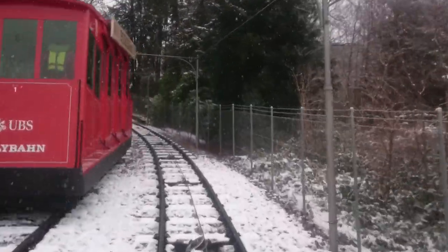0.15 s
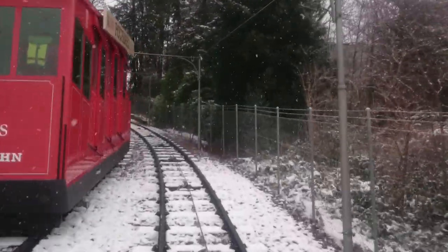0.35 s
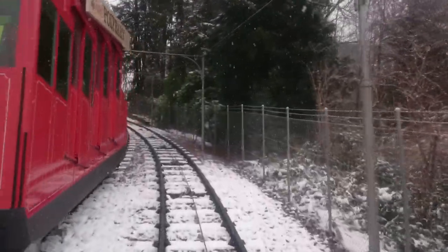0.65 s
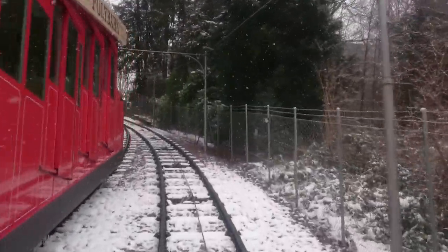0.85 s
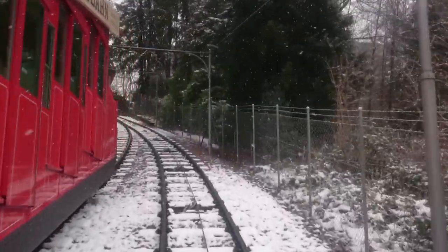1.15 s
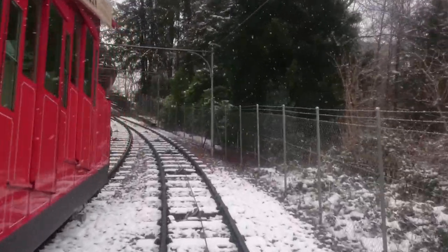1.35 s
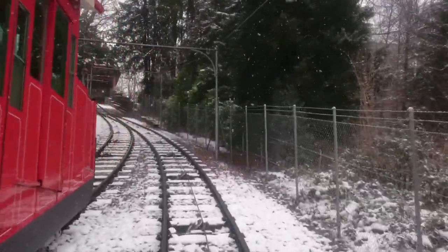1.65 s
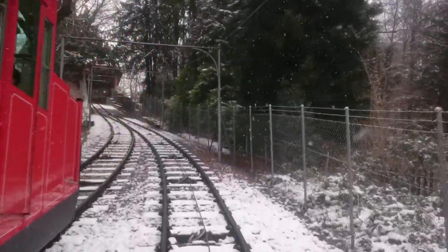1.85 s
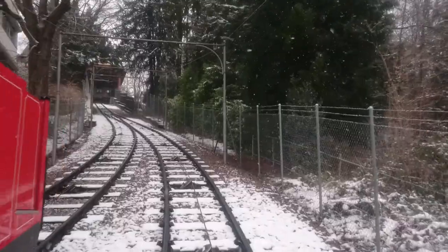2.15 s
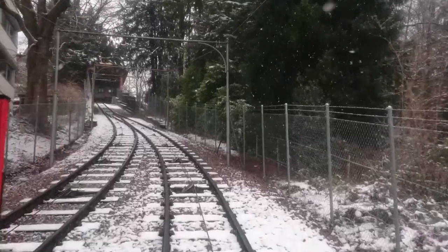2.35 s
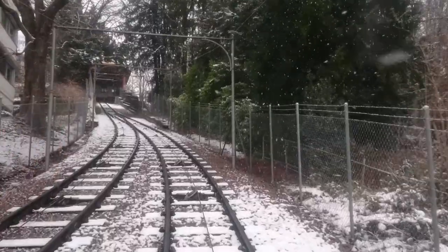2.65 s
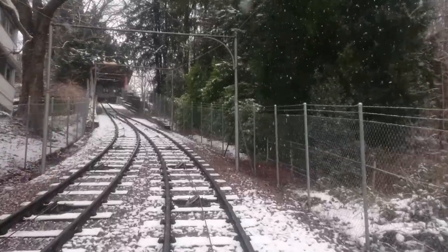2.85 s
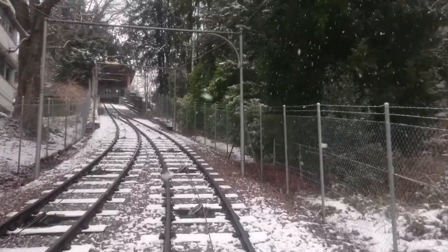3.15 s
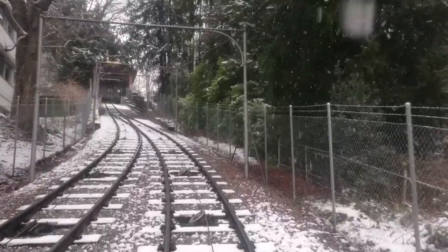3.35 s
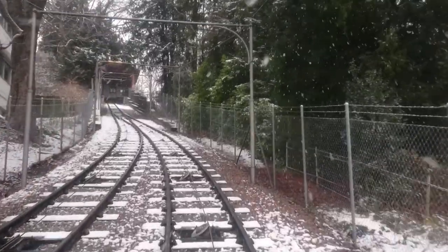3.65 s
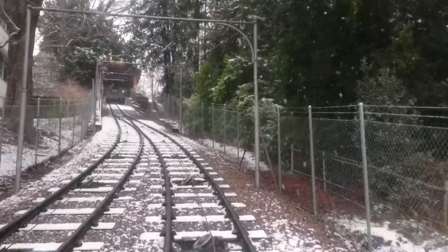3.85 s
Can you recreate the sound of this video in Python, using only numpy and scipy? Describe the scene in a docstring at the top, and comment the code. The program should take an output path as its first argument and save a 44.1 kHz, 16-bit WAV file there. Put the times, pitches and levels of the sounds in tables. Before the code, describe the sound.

Wind buffets the microphone in rough gusts over faint hissing rail wheels, knocks and ticks.

```python
"""A snowy slope, heard from the open front of a funicular car while another car rolls past.
Wind buffets the two microphone ports separately: noise split by eddy size, with sharp snaps and cracks.
Under it the wheels hiss and ring on the rails (noise through resonances), rollers knock (grit ringing
decaying tones) and metal fittings tick (short bright noise). The strongest buffets overload the recorder."""
import sys
import numpy as np
from scipy import signal
from scipy.fft import rfft, irfft
from scipy.io import wavfile
from scipy.ndimage import uniform_filter1d

SR = 44100
rng = np.random.default_rng(int(sys.argv[2]) if len(sys.argv) > 2 else 0)


def file_out(sig):
    """Save sig as 16-bit WAV at sys.argv[1]."""
    # one column per channel
    cols = np.atleast_2d(sig).T
    # limit, then scale
    lim = np.clip(cols, -1, 1)
    pcm = np.round(lim * 32767).astype(np.int16)
    wavfile.write(sys.argv[1], SR, pcm)


def to_linear_factor(level_db):
    """Convert decibel levels (scalar or array-like) to linear amplitude factors."""
    exponent = np.asarray(level_db, float) / 20
    return 10 ** exponent


N = 176400  # length in samples: 4 s
FULL_GUST_DB = -14.5  # gust level that counts as a full gust

# roller knocks, which also make the rolling noise swell: (time [s], level before a common trim [dB])
KNOCKS = [(0.511, -38), (2.0806, -34), (2.3215, -33.5), (2.5732, -26.5), (2.8258, -34.5), (3.1, -38)]


def shaped(z, gain):
    """Filters each row by a gain over frequency."""
    return irfft(rfft(z) * gain, z.shape[-1])


def evened(x):
    """Scales to rms 1."""
    return x / np.sqrt(np.mean(x ** 2) + 1e-20)


def read(points, hz):
    """Reads a table on a log-frequency axis."""
    f, value = np.transpose(points)
    return np.interp(np.log(hz + 1), np.log(f + 1), value)


def add(mix, s, sound):
    """Mixes rows of sound in at time s."""
    part = mix[:, round(s * SR):][:, :sound.shape[1]]
    part += sound[:, :part.shape[1]]


def wind(gust_points, snap_points):
    """One turbulent stream split by eddy size; faster air lifts most small eddies more, in quick flutters."""
    # eddy sizes, large to small: (centre [Hz], level in a full gust [dB],
    # rise per dB of gust [dB/dB], flutter strength [dB])
    eddies = [(40, -46, 2.5, 0.5), (61.6, -21, 0.32, 2.5), (94.6, -16, 1.13, 1.5),
              (145.4, -20.5, 0.84, 5.5), (233.3, -20.5, 1.66, 4), (377, -26, 2.03, 4.5),
              (623, -42.5, 1.58, 6.5), (960, -46.5, 2, 8), (1700, -65.5, 4, 5)]
    eddy_octaves, flutter_hz = 0.35, 114  # spread of each band, upper limit of the flutter
    puff_db, puff_s = 4.5, 0.009  # the air speeds up briefly around each snap
    hz = np.fft.rfftfreq(N, 1 / SR) + 1e-3
    air = rng.standard_normal(N)

    flutter_gain = np.exp(-(hz / flutter_hz) ** 2) * np.minimum(hz / 8, 1)
    flutter = evened(shaped(rng.standard_normal(N), flutter_gain))
    flutter = 2 * np.tanh(flutter / 2)  # rounds off the extremes

    t = np.arange(0, N, 32) / SR
    puffs = np.tanh(sum(np.exp(-((t - s) / puff_s) ** 2) for s, _ in snap_points))
    coarse_db = np.interp(t, *np.transpose(gust_points)) + puff_db * puffs
    gust_db = np.interp(np.arange(N) / SR, t, coarse_db) - FULL_GUST_DB

    stream = np.zeros(N)
    for f, db, follow, flutter_db in eddies:
        band = evened(shaped(air, np.exp(-.5 * (np.log2(hz / f) / eddy_octaves) ** 2)))
        stream += to_linear_factor(db + follow * gust_db + flutter_db * flutter) * band
    return stream


def rolling():
    """Wheel noise through rail and car-body resonances, with drifting patches and a treble rattle."""
    # relative spectrum of wheels on rails: (frequency [Hz], level per Hz [dB])
    rail_spectrum = [(150, -12.5), (500, -5), (700, -7.5), (1000, -10.5), (1300, -11.5), (1700, -16.5),
                     (2050, -20.5), (2400, -17), (2900, -25), (3700, -27.5), (4800, -37), (5400, -31.5),
                     (6300, -30), (7300, -37), (9000, -44.5), (11500, -54), (15300, -54)]
    # course of the rolling: (time [s], level before a common lift [dB], extra treble [dB])
    roll_course = [(0, -50, 1.5), (0.501, -49.5, 1), (.9, -50.5, 4.5), (1.201, -49, 2), (1.6, -49, 4),
                   (2.2, -47.5, 1.5), (2.7, -48.5, -0.5), (3.201, -50.5, -1), (4, -51.5, -1)]
    # likeness of the two sides: (frequency [Hz], correlation [-1 to 1])
    side_likeness = [(200, -0.3), (550, -0.82), (1000, -0.46), (1800, 0.5), (2250, -0.43), (2800, 0.13),
                     (13000, 0.02)]
    # balance of the two sides: (frequency [Hz], left minus right [dB])
    side_balance = [(300, -1), (900, -5), (1700, -4), (2500, -1.5), (2900, 1.5), (4400, -2.5), (5500, -0.5),
                    (6300, -5.5), (12000, 1.5), (14500, 4)]
    # rail and car-body resonances: (centre [Hz], width [Hz], lift [dB])
    resonances = [(700, 7.9, 7.5), (1160, 41, 3.5)]
    roll_gain_db, patch_db, rattle_db = 10.5, 1.38, 0.85
    # the noise swells around each knock
    surge_hz, surge_octaves, surge_db, surge_s = 1440, 0.95, 3, 0.037
    # a faint hissy rail squeal
    squeal_s, squeal_half_s, squeal_hz, squeal_width_hz, squeal_db = 0.63, .11, 5500, 150, 8
    # the passing car sings in a wide band until it has gone by; half the lift (in dB) is left at gone_s
    passing_hz, passing_width_hz, passing_db, gone_s = 1730, 240, 6.5, 2.0

    frames, hz = N // 128 + 5, np.fft.rfftfreq(512, 1 / SR)
    t = np.arange(frames) * 128 / SR
    column = hz[:, None]
    a, b, c, d, patches = rng.standard_normal((frames, 257, 5)).T
    patches = evened(uniform_filter1d(uniform_filter1d(patches, size=8, axis=0), size=20, axis=1))
    rattle = evened(uniform_filter1d(rng.standard_normal(frames), size=4))

    # right side: partly the left noise, partly its own
    same = read(side_likeness, hz)[:, None]
    left = a + 1j * b
    z = np.array([left, same * left + np.sqrt(1 - same ** 2) * (c + 1j * d)])

    s, level_db, treble_db = np.transpose(roll_course)
    high = np.clip(np.log2(hz / 3000 + 1e-9), 0, 1)[:, None]  # comes in from 3 to 6 kHz
    treble = high * (rattle_db * rattle + np.interp(t, s, treble_db))
    z *= to_linear_factor(read(rail_spectrum, hz)[:, None] + patch_db * patches + treble)
    z *= to_linear_factor(np.array([.5, -.5])[:, None, None] * read(side_balance, hz)[:, None])

    near = 1 / (1 + (t / gone_s) ** 6)
    z *= to_linear_factor(passing_db * near / (1 + (2 * (column - passing_hz) / passing_width_hz) ** 2))

    surge = sum(np.exp(-((t - at) / surge_s) ** 2) for at, _ in KNOCKS)
    surge_band = np.exp(-(np.log2(column / surge_hz + 1e-9) / surge_octaves) ** 2)
    z *= to_linear_factor(surge_db * surge * surge_band)

    squeal_time = ((t - squeal_s) / squeal_half_s) ** 2
    squeal_band = ((column - squeal_hz) / squeal_width_hz) ** 2
    z *= to_linear_factor(squeal_db * np.exp(-squeal_time - squeal_band))

    x = signal.istft(z, nperseg=512, noverlap=384)[1][:, :N]
    fine = np.fft.rfftfreq(N, 1 / SR)
    x = shaped(x, to_linear_factor(sum(db / (1 + (2 * (fine - f) / width) ** 2) for f, width, db in resonances)))
    return evened(x) * to_linear_factor(roll_gain_db + np.interp(np.arange(N) / SR, s, level_db))


def ticks():
    """Metal fittings tick: short bright cracks of noise with a hissing tail."""
    # (time [s], level before a common trim [dB], slope above the tick's centre [dB per octave])
    tick_points = [(0.2735, -26.5, -33), (0.425, -44, -23.5), (1.048, -49, -11.5), (1.1492, -41, -18.5),
                   (1.3657, -41, -21.5), (1.674, -47, -9.5), (2.0291, -30.5, -35), (2.1843, -45.5, -14.5),
                   (3.163, -45.5, -19), (3.5945, -44, -16)]
    centre_hz, low_db_oct, body_db = 6060, 31, -16  # below the centre: a slope down to a flat body
    crack_t60, tail_db, tail_t60 = .018, -12, 0.34  # fall by 60 dB [s] of crack and tail
    balance_db = -5.5  # left minus right
    t, out = np.arange(8192) / SR, np.zeros((2, N))
    octaves = np.log2(np.fft.rfftfreq(8192, 1 / SR) / centre_hz + 1e-6)
    low_db = np.maximum(low_db_oct * octaves, body_db)
    fade = to_linear_factor(-60 * t / crack_t60) + to_linear_factor(tail_db - 60 * t / tail_t60)
    fade *= np.minimum(t / 0.00033, 1)  # quick onset
    sides_db = balance_db * np.array([[.5], [-.5]])
    for (s, db, bright_db), z in zip(tick_points, rng.standard_normal((len(tick_points), 2, 8192))):
        noise = evened(shaped(z, to_linear_factor(np.where(octaves < 0, low_db, bright_db * octaves))))
        add(out, s, noise * fade * to_linear_factor(db - 8.5 + sides_db))
    return out


def snaps(snap_points):
    """Sharp eddies cross a port: a quick pressure dip, lopsided by chance; stronger ones are narrower."""
    snap_s, snap_db, narrows_per_db = .0006, 3, .028  # width at full-gust level, common lift
    t, out = np.arange(-200, 200) / SR, np.zeros((1, N))
    for (s, db), draw in zip(snap_points, rng.random(len(snap_points))):
        u = t / (snap_s * np.exp(-narrows_per_db * (db - FULL_GUST_DB)))
        dip = (u ** 2 - 1 + 2 * (2 * draw - 1) * u) * np.exp(-u ** 2 / 2)
        add(out, s + t[0], to_linear_factor(db + snap_db) * dip[None])
    return out[0]


def knocks():
    """Rollers knock, dull and scraping: a short burst of grit rings the same tones with chance strengths."""
    # ringing tones of a knock: (frequency [Hz], level [dB], time to fall by 60 dB [s])
    knock_modes = [(927, 2, 0.068), (1134, -1, 0.11), (1643, 0, 0.21), (1846, -4, 0.077),
                   (2390, -13, 0.053)]
    knock_db, grit_s = -4.5, 0.016  # common trim, fall of the grit to 1/e
    t, out = np.arange(6000) / SR, np.zeros((2, N))
    grits = rng.standard_normal((len(KNOCKS), 2, len(t)))
    grits *= np.exp(-t / grit_s) / np.sqrt(grit_s * SR / 2)
    draws = rng.random((len(KNOCKS), len(knock_modes)))
    sides = to_linear_factor(np.array([[-2], [2]]))  # stronger on the right
    for (s, db), draw, grit in zip(KNOCKS, draws, grits):
        ring = np.zeros(len(t))
        for chance, (hz, mode_db, t60) in zip(draw, knock_modes):
            ring += (.5 + chance) * to_linear_factor(mode_db - 60 * t / t60) * np.sin(2 * np.pi * hz * t)
        add(out, s, signal.fftconvolve(ring[None], grit, axes=1) * to_linear_factor(db + knock_db) * sides)
    return out


def cracks():
    """The hardest gust cracks at the right port: a pointed kink in the pressure, reaching into the treble."""
    # (time [s], peak level [dB])
    crack_points = [(3.8014, -12.5), (3.83, -7), (3.8486, -14.5), (3.8647, -1), (3.87, -17), (3.895, -17.5)]
    crack_s = .0003  # fall to 1/e on either side of the point
    t, out = np.arange(-100, 100) / SR, np.zeros((2, N))
    for s, db in crack_points:
        add(out, s + t[0], -to_linear_factor(db) * np.exp(-abs(t) / crack_s) * np.array([[0], [1]]))
    return out


def scene():
    """Wind at each port over the sounds of the cars."""
    # gust strength at each port: (time [s], level [dB])
    gust_left = [(0.0, -37.5), (0.15, -41), (0.41, -44.5), (0.5, -20), (0.66, -22), (0.7, -31),
                 (0.96, -36.5), (1.03, -21.5), (1.08, -37), (1.13, -18.5), (1.29, -25), (1.32, -15),
                 (1.55, -22), (1.69, -15), (1.76, -24), (1.83, -15), (2.08, -19), (2.27, -16), (2.38, -17),
                 (2.46, -19), (2.59, -17.5), (2.71, -16), (2.87, -32.5), (2.91, -18), (2.94, -46),
                 (3.11, -41), (3.26, -26.5), (3.41, -29.5), (3.57, -22), (3.62, -36), (3.7, -28.5),
                 (3.83, -19.5), (3.98, -24)]
    gust_right = [(0.0, -44), (0.1, -34), (0.16, -47), (0.21, -31.5), (0.39, -38.5), (0.41, -27),
                  (0.52, -28.5), (0.56, -22), (0.65, -25.5), (0.73, -17), (0.97, -34.5), (1.1, -25),
                  (1.14, -45), (1.25, -31), (1.32, -33), (1.4, -18.5), (1.55, -27), (1.72, -20.5),
                  (1.76, -24.5), (1.81, -17), (1.88, -26.5), (2.01, -22.5), (2.48, -25.5), (2.66, -24.5),
                  (2.86, -27), (2.95, -46), (3.01, -15), (3.19, -19), (3.41, -18), (3.5, -17),
                  (3.61, -13.5), (3.66, -23), (3.87, -11.5), (3.95, -19), (3.98, -17.5)]
    # single sharp eddies snapping across each port: (time [s], level before a common lift [dB])
    snaps_left = [(0.506, -16.5), (.597, -16), (1.1894, -13.5), (1.2187, -17.5), (1.2381, -8.5),
                  (1.2486, -18), (1.2833, -13), (1.3035, -22), (1.4633, -17), (1.5063, -13.5),
                  (1.585, -11.5), (1.5984, -8.5), (1.6484, -20), (1.671, -15.5), (1.69, -7), (1.7302, -9),
                  (1.843, -12), (1.9388, -5.5), (1.9773, -12), (2.0349, -14), (2.0651, -14), (2.0953, -10),
                  (2.1073, -13.5), (2.2398, -9.5), (2.3523, -17.5), (2.376, -6.5), (2.3912, -7),
                  (2.5286, -18.5), (2.5591, -16), (2.574, -9), (2.636, -25), (2.668, -12.5),
                  (2.6918, -15.5), (2.7062, -12), (2.7347, -12.5)]
    snaps_right = [(0.417, -21), (0.7359, -13.5), (3.0359, -10.5), (3.3361, -20.5), (3.356, -13),
                   (3.4021, -12.5), (3.4098, -9), (3.4582, -14), (3.4975, -12.5), (3.5049, -9),
                   (3.5127, -12.5), (3.6034, -20), (3.6814, -15), (3.7836, -12), (3.8021, -1),
                   (3.809, -4.5), (3.8235, -1.5), (3.8439, -3.5), (3.8505, 0.5), (3.8632, -3), (3.8722, -1),
                   (3.8827, -10), (3.8967, -7.5), (3.9644, -9)]
    left = wind(gust_left, snaps_left) + snaps(snaps_left)
    right = wind(gust_right, snaps_right) + snaps(snaps_right)
    return np.array([left, right]) + rolling() + ticks() + knocks() + cracks()


def band_limit(x):
    """A steep low-pass at the top of the band."""
    return signal.sosfilt(signal.butter(12, 15760, fs=SR, output="sos"), x)


def record(dry):
    """Widening and a low cut; then a limiter ducks around peaks and a soft ceiling flattens what is left."""
    crossfeed, low_cut_hz = .04, 44
    limit_db, limit_share, fall_db_per_s = -4, 0.48, 53.5  # the share of the excess that is taken off
    ceiling, knee = .9, 5
    wide = dry - crossfeed * dry[::-1]  # each port goes inverted into the other
    wide = signal.sosfilt(signal.butter(2, low_cut_hz, "high", fs=SR, output="sos"), wide)

    # the tracked peak level jumps up at once and falls steadily
    fall = np.arange(N) * fall_db_per_s / SR
    peak_db = 20 * np.log10(abs(wide).max(0) + 1e-9)
    held_db = np.maximum.accumulate(peak_db + fall) - fall
    over_db = np.maximum(held_db - limit_db, 0)
    # smoothed mostly after the peak, so the fastest peaks are only partly ducked
    limited = wide / to_linear_factor(limit_share * uniform_filter1d(over_db, size=200, origin=60))
    flattened = limited / (1 + abs(limited / ceiling) ** knee) ** (1 / knee)
    return band_limit(flattened)


dry = scene()
out = record(dry)
file_out(out)
```